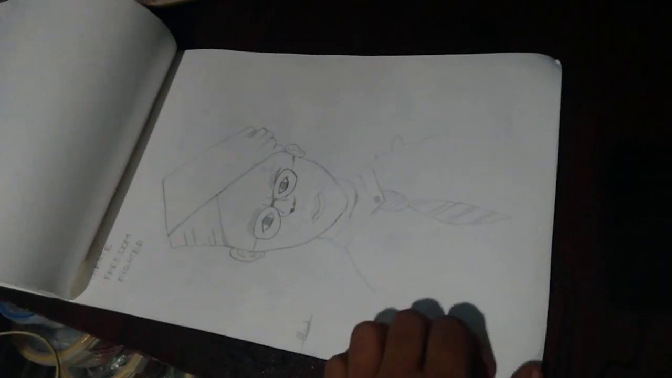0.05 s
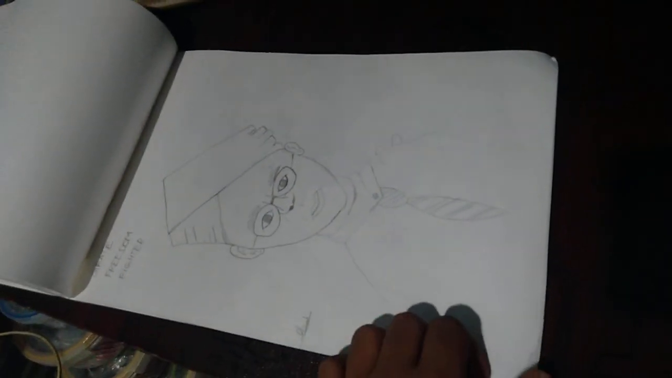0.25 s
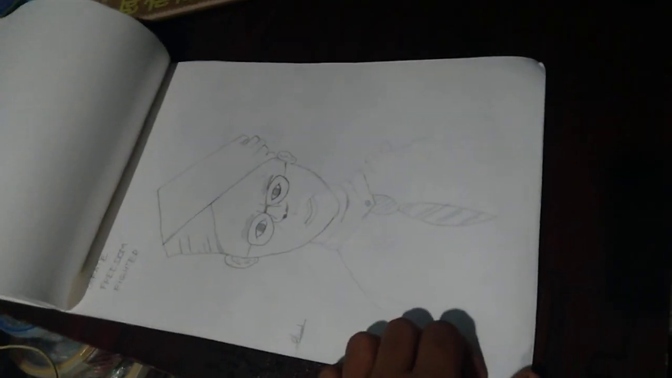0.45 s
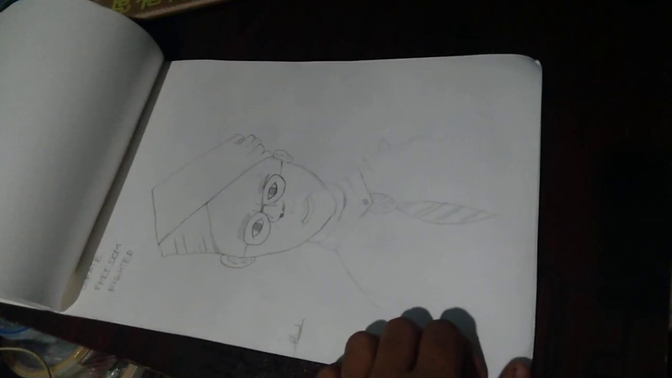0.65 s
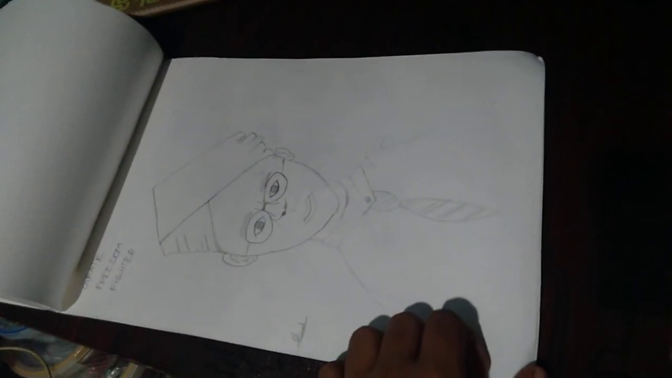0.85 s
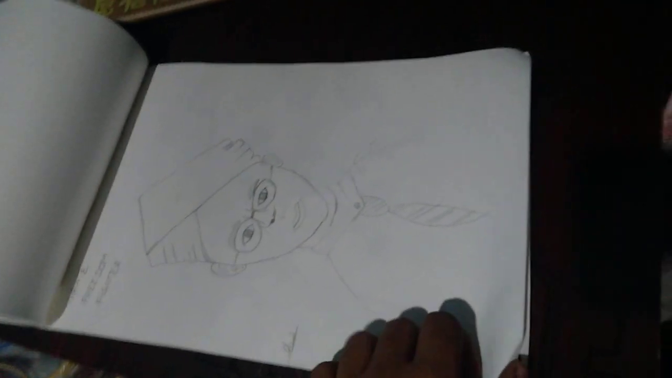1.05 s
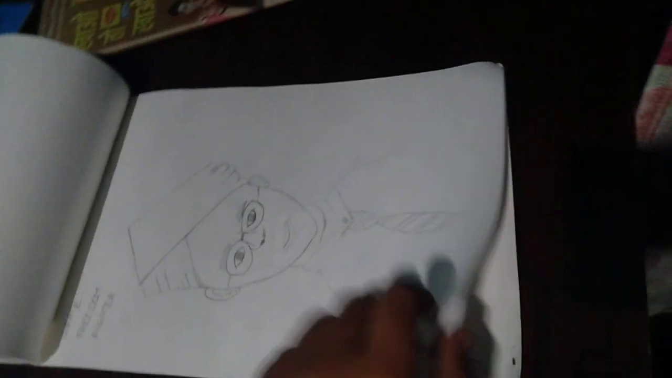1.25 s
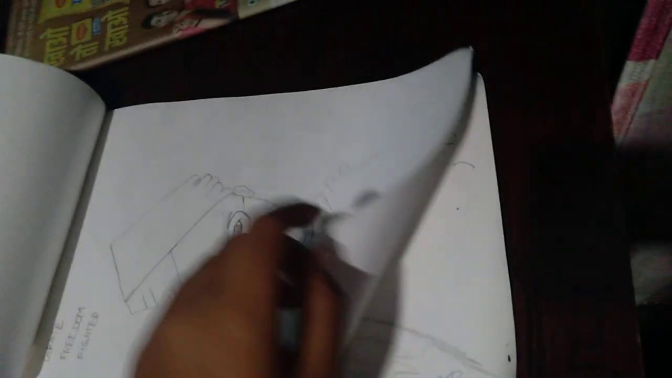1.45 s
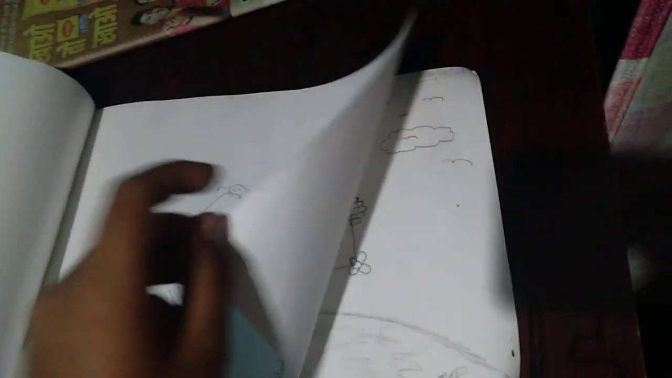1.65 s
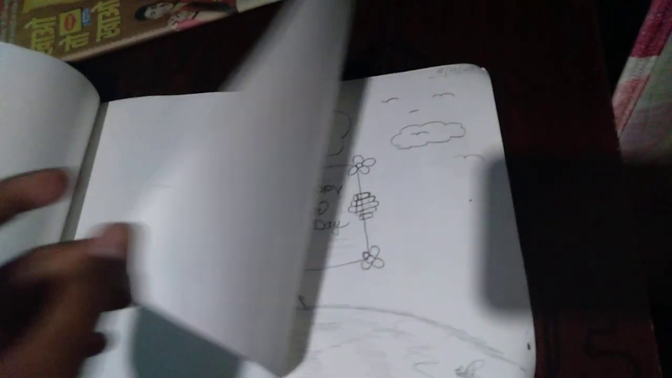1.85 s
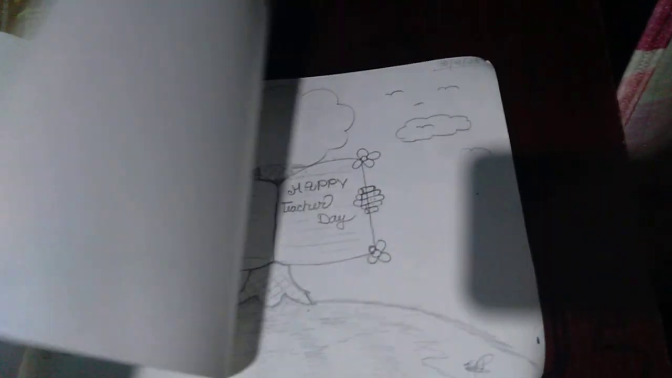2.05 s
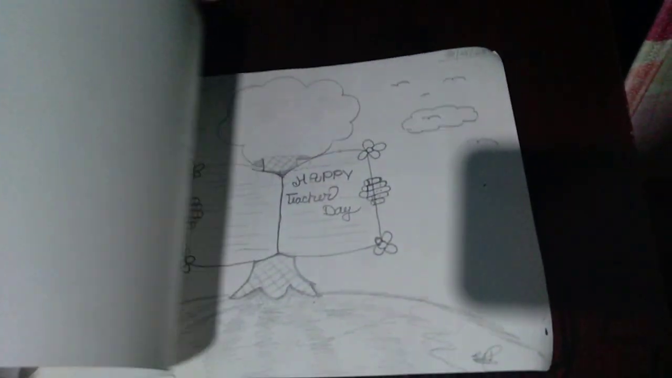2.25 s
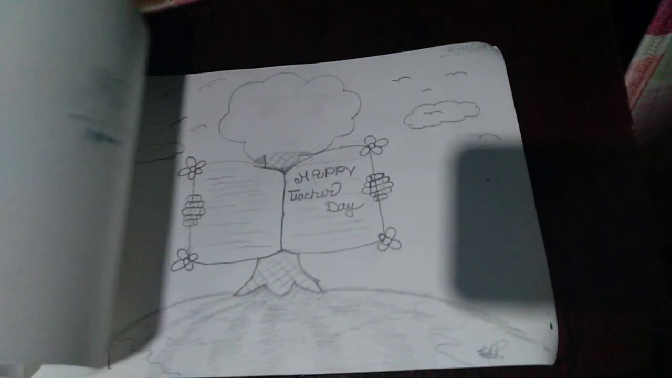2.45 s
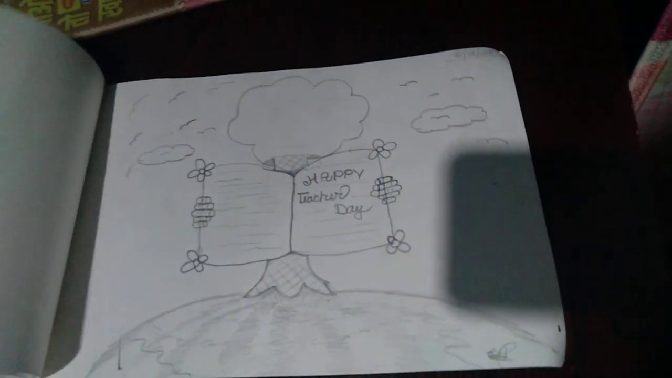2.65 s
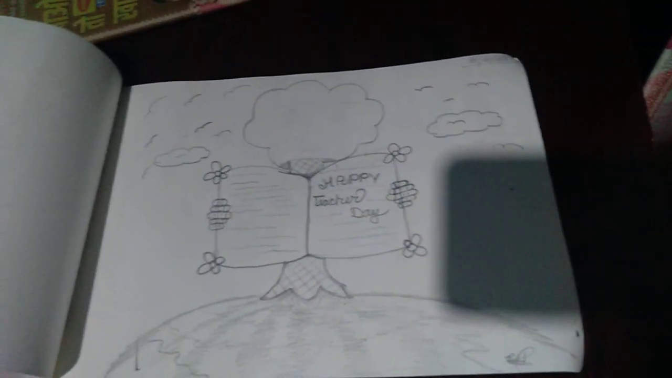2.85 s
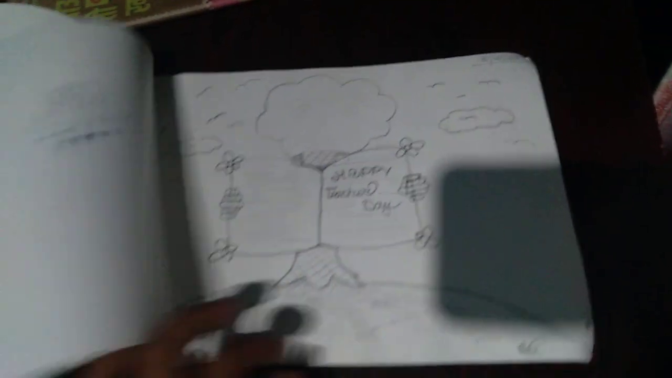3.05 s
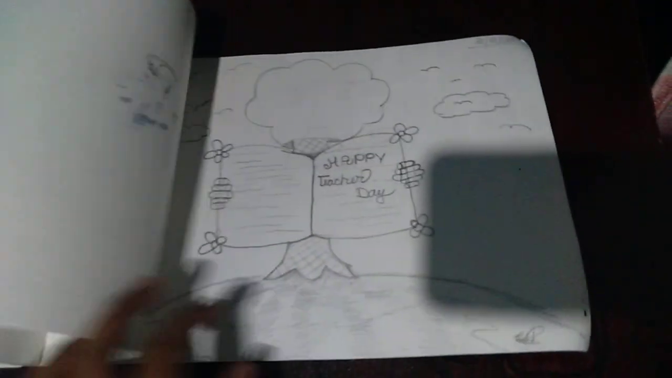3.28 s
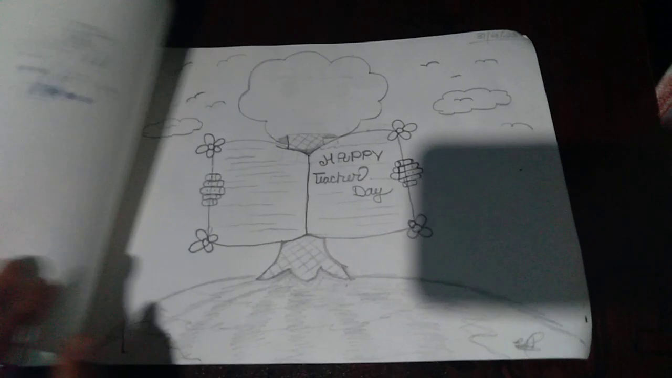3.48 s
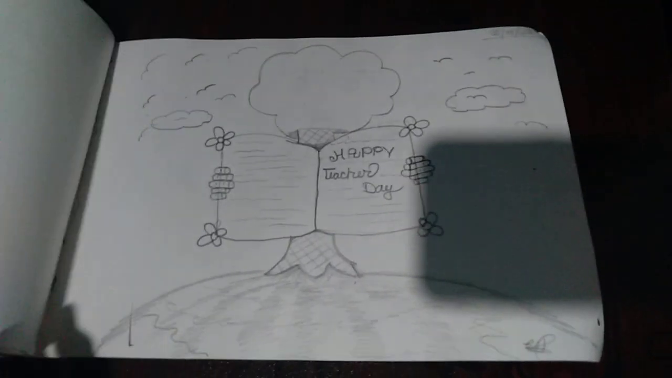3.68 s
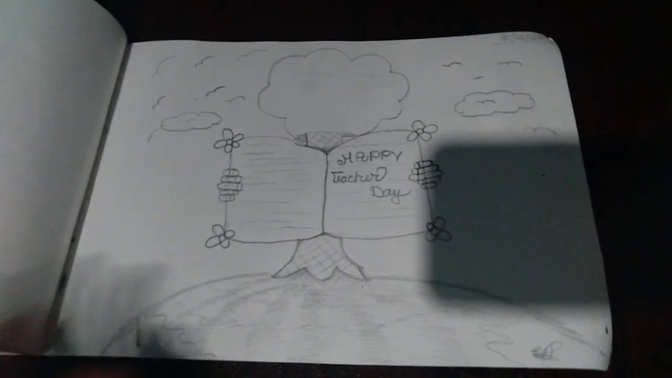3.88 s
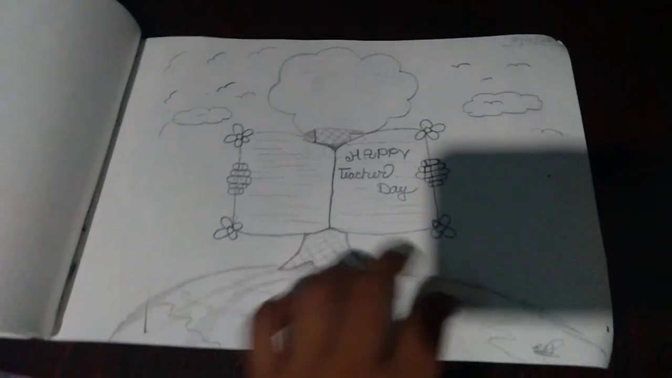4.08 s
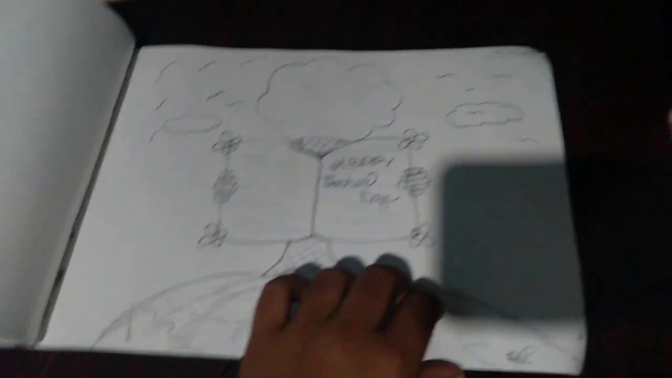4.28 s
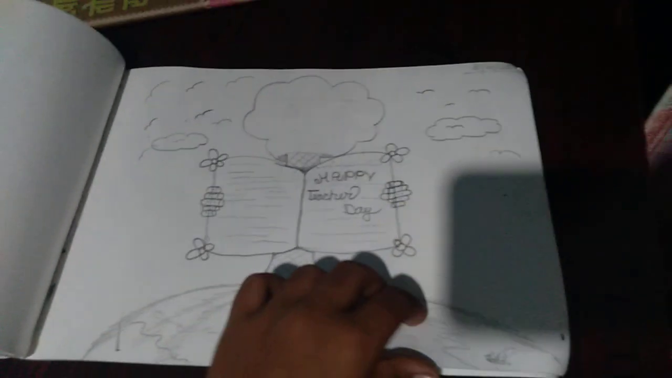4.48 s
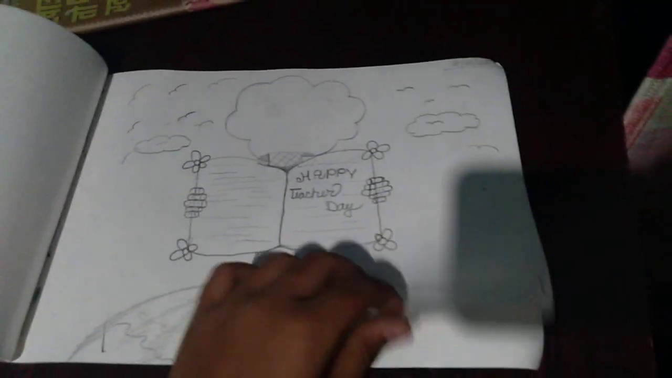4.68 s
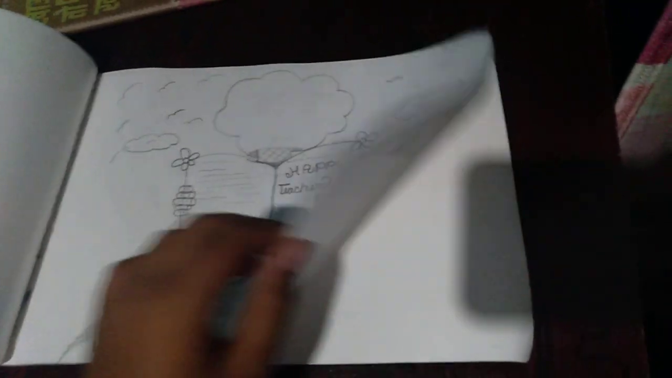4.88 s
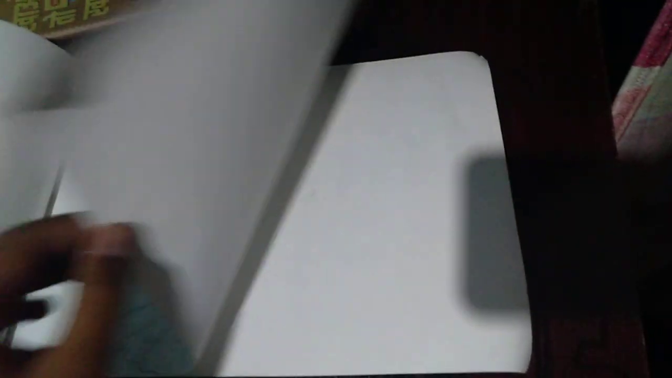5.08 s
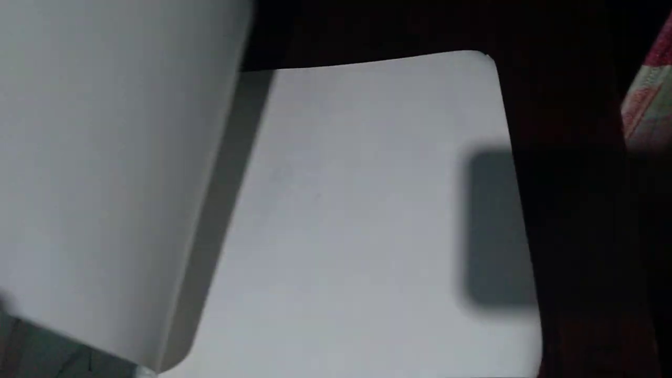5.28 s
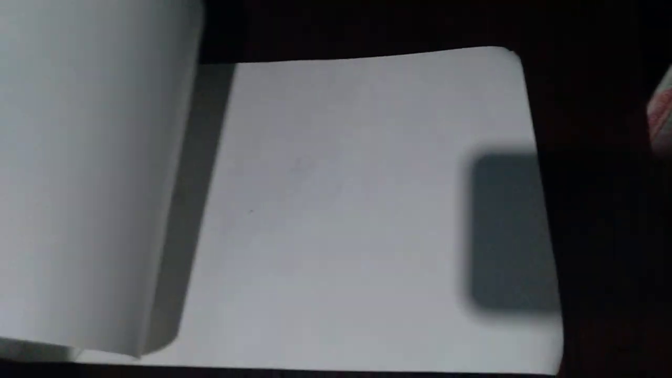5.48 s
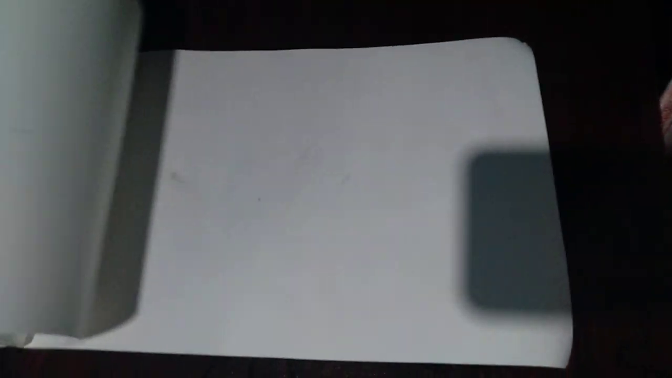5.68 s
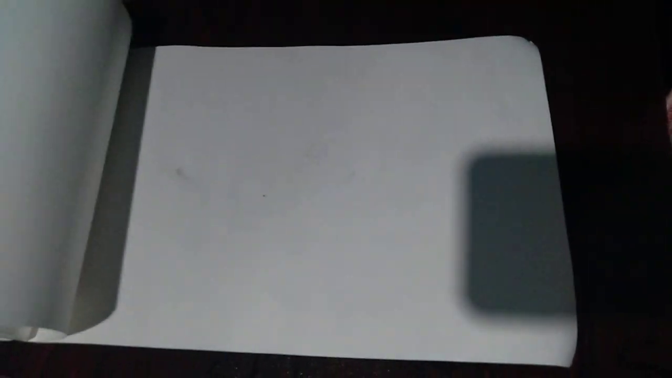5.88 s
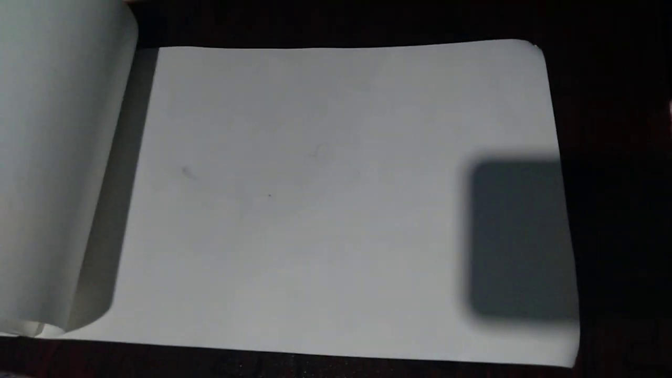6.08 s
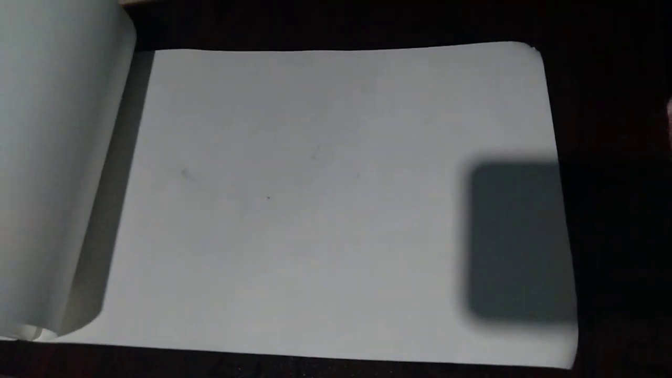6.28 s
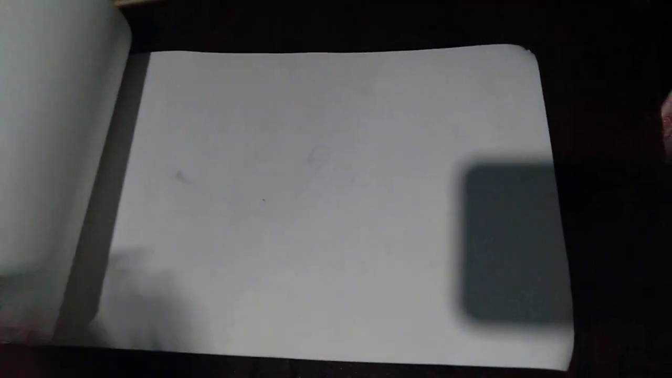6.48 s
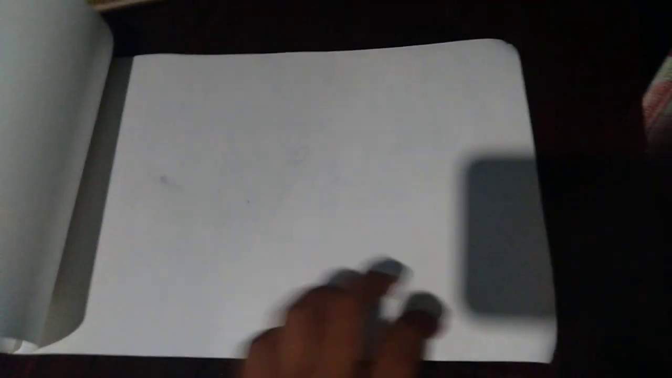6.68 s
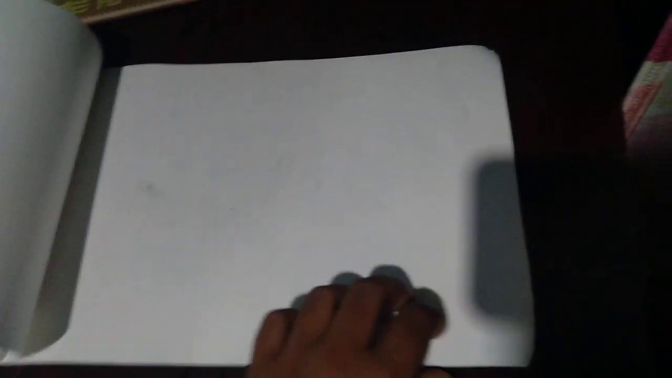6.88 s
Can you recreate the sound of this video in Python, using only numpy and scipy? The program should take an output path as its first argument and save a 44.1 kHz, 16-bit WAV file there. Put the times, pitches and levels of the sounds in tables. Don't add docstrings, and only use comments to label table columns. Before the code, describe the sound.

Sketchbook pages are turned and smoothed by hand in a quiet room, with crisp rustles, a papery slap and faint watery noise between.

```python
import sys
import numpy as np
from scipy import signal
from scipy.fft import rfft, irfft, next_fast_len
from scipy.io import wavfile
from scipy.ndimage import uniform_filter1d

SR = 44100
rng = np.random.default_rng(int(sys.argv[2]) if len(sys.argv) > 2 else 0)


def output_pcm(signal):
    pcm = np.clip(np.atleast_2d(signal).T, -1, 1) * 32767
    wavfile.write(sys.argv[1], SR, np.round(pcm).astype(np.int16))


def field_ratio(decibels):
    return 10 ** (np.asarray(decibels, dtype=float) / 20)


N = 306054
TIME = np.arange(N) / SR


def unit(x):
    return x / np.sqrt(np.mean(x ** 2))


def colour(x, table, lo=1, hi=SR):
    size = next_fast_len(len(x))
    f = np.maximum(np.arange(size // 2 + 1) * SR / size, 1)
    hz, db = np.transpose(table)
    edges = 1 / np.sqrt((1 + (lo / f) ** 16) * (1 + (f / hi) ** 16))
    gain = field_ratio(np.interp(np.log(f), np.log(hz), db)) * edges
    return irfft(rfft(x, size) * gain, size)[:len(x)]


def resonance(x, hz, width_hz):
    b, a = signal.iirpeak(hz, hz / width_hz, fs=SR)
    return signal.lfilter(b, a, signal.lfilter(b, a, x))


def evened(x, span_s, share):
    span = int(span_s * SR)
    slow = uniform_filter1d(uniform_filter1d(x ** 2, span), span)
    return unit(x / (slow + 1e-18) ** (np.clip(share, 0, 1) / 2))


def swell(s, db, rise_s, fall_s):
    age = TIME[::44] - np.asarray(s)[:, None]
    rise = np.maximum(rise_s, .002)[..., None]
    fall = np.maximum(fall_s, .002)[:, None]
    pace = np.where(age < 0, -rise, fall)
    return field_ratio(np.asarray(db)[:, None] - 20 * age / pace)


def smooth(steps):
    return np.interp(TIME, TIME[::44], steps)


def drift(shape, span):
    return uniform_filter1d(uniform_filter1d(rng.standard_normal(shape), span), span)


def streaks(depth_db, hold_s, patchy_db, size=576):
    overlap = size * 3 // 4
    cells = signal.stft(rng.standard_normal(N), nperseg=size, noverlap=overlap)[2]
    span = max(int(hold_s * SR / (size / 4)), 1)
    alone = drift(cells.shape, span)
    shared = uniform_filter1d(drift(cells.shape, span), size=9, axis=0)
    opened = field_ratio(depth_db * np.clip(unit(alone), .35, 1.45) + patchy_db * unit(shared))
    return signal.istft(cells * opened, nperseg=size, noverlap=overlap)[1][:N]


# freq_hz [Hz], level_db [dB per Hz]
ROOM_SPECTRUM = [(18, -42.5), (40, -6.5), (86, 6), (220, -10), (955, -27), (2270, -26.5), (7200, -6.5),
                 (15800, -26.5)]
# freq_hz [Hz], level_db [dB per Hz]
SELF_NOISE_SPECTRUM = [(100, -3), (300, -2.5), (1000, -15.5), (4500, -17), (5500, -2), (7500, -6.5),
                       (11000, -9.5), (15800, -21)]


def room_floor(plain):
    air = streaks(depth_db=20.5, hold_s=.05, patchy_db=2.5)
    room = unit(colour(air, ROOM_SPECTRUM)) * field_ratio(-77)
    return room + unit(colour(plain, SELF_NOISE_SPECTRUM)) * field_ratio(-80.5)


# freq_hz [Hz], level_db [dB per Hz]
RUB_SPECTRUM = [(180, -37.5), (300, 6.5), (404, -1.5), (519, 2.5), (643, -0.5), (785, 6), (1090, -6),
                (1520, -11.5), (5290, -24.5), (7250, -7.5), (15800, -36)]
# start_s [s], level_db [dB], brightness_oct [octaves above 1 kHz], fall_s [s]
TOUCHES = [(0.0, -67.5, 1, 0.11), (0.0, -73, 4, 0.84), (0.406, -63, 2, 0.085), (1.602, -64.5, 1, 0.11),
           (1.89, -61.5, 2, 0.13), (2.356, -66, 1.65, 0.27), (2.357, -74.5, 1.5, 0.45),
           (2.681, -60, 0.2, 0.074), (3.355, -60.5, 2, 0.33), (3.354, -61.5, 7, 0.77),
           (3.618, -51, 3, 0.077), (3.882, -57, 4.5, 0.051), (3.881, -62, 2.5, 0.11), (4.059, -67, 2, 0.42),
           (4.059, -61, -9, 0.1), (4.225, -59.5, 4, 0.05), (4.225, -64.5, 1.46, 0.15),
           (4.405, -61.5, 2, 0.32), (4.884, -62.5, 0.9, 0.23), (5.121, -61, 0.5, 0.25),
           (5.12, -62.5, 3.5, 0.13), (5.403, -70, 2, 0.21), (6.341, -60, 1.46, 0.094),
           (6.341, -63.5, 2.5, 0.15), (6.405, -60.5, 2.5, 0.13), (6.405, -63.5, 1.5, 0.08),
           (6.518, -63.5, 3.5, 0.21), (1.995, -63.5, 1.8, 0.056), (5.455, -77, -1, 0.064),
           (5.503, -75, 1, 0.12)]
# peak_s [s], level_db [dB], brightness_oct [octaves above 1 kHz], rise_s [s], fall_s [s]
STROKES = [(0.138, -55, 2.5, 0.033, 0.047), (0.13, -54.5, 1.5, 0.057, 0.053),
           (0.091, -55.5, 4.5, 0.081, .1), (0.064, -64, 1.5, 0.078, 0.088),
           (1.317, -60.5, 2.12, 0.051, 0.18), (1.322, -62, 6.5, 0.033, 0.17),
           (2.3, -61.5, 1.3, 0.061, 0.12), (1.5, -63.5, 3.2, 0.047, 0.057), (1.186, -78, 2.5, 0.077, 0.15),
           (1.01, -72.5, 4, 0.092, 0.23), (4.2, -66, 3.5, 0.08, 0.1), (3.53, -60.5, 3, 0.074, 0.19),
           (3.39, -69.5, 4.5, 0.04, 0.053), (0.23, -71, 1.9, 0.21, 0.12), (0.654, -63.5, 3, 0.066, 0.082),
           (0.2, -66.5, 1.5, .1, 0.16), (1.42, -66.5, 1.5, 0.037, 0.051), (1.93, -66, 1.4, 0.13, 0.064),
           (0.84, -95, 2, 0.056, 0.1), (1.04, -60, 9, .2, 0.15), (1.346, -62, 3.5, 0.094, 0.083),
           (2.9, -62.5, 4.5, 0.036, 0.17), (2.2, -65, 0.5, 0.067, 0.04), (2.664, -56.5, 2.5, 0.049, 0.07),
           (2.93, -71.5, 1, 0.13, 0.045), (3.015, -61.5, 4.5, 0.25, 0.086), (3.452, -62, 1.2, 0.105, 0.19),
           (4.5, -49, 6.5, 0.3, .05), (4.3, -68.5, 3, 0.24, 0.13), (4.74, -65.5, 0.1, 0.062, 0.17),
           (4.762, -73.5, 2, 0.27, 0.3), (5.72, -72.5, 1.7, 0.069, 0.11), (5.9, -67, 1.32, 0.076, 0.21),
           (6.32, -64.5, 2.5, 0.26, 0.024), (6.2, -73, 4, 0.2, 0.55), (0.13, -52, 3, 0.036, 0.048),
           (2.56, -68, 0.66, 0.047, 0.39), (3.5, -71.5, 2.15, 0.75, 0.36)]


def rubbing():
    streaky = streaks(depth_db=27.0, hold_s=0.077, patchy_db=3.0)
    plain = rng.standard_normal(N)
    s, db, touch_octave, fall_s = np.transpose(TOUCHES)
    touches = swell(s, db, np.array([.004]), fall_s)
    s, db, stroke_octave, rise_s, fall_s = np.transpose(STROKES)
    gains = np.vstack([touches, swell(s, db, rise_s, fall_s)])
    octaves = np.concatenate([touch_octave, stroke_octave])
    out = np.zeros(N)
    for band in np.arange(-1.15, 3.8, .7):
        share = field_ratio(-7.5 * (octaves - band) ** 2)
        bed = field_ratio(-93 + 3.5 * band)
        lo_hz, hi_hz = 1000 * 2 ** (band - .35), 1000 * 2 ** (band + .35)
        broken = evened(colour(streaky, RUB_SPECTRUM, lo_hz, hi_hz), span_s=0.15, share=0.88)
        even = unit(colour(plain, RUB_SPECTRUM, lo_hz, hi_hz))
        gain = smooth(np.sqrt(share ** 2 @ gains ** 2 + bed ** 2))
        even_share = np.clip(0.72 - 0.39 * max(band - 1, 0), 0, 1)
        mix = even_share / (1 + (field_ratio(-67.5) / gain) ** 2)
        out += gain * (np.sqrt(1 - mix) * broken + np.sqrt(mix) * even)
    return out


def pitched_noise(table, source, lead):
    out = np.zeros(N)
    for t0, t1, hz, width_hz, db in table:
        part = slice(int(max(t0, 0) * SR), min(int(t1 * SR), N))
        age = np.linspace(0, 1, part.stop - part.start)
        noise = source[part.start:part.stop + lead]
        tone = unit(resonance(noise, hz, width_hz)[lead:])
        out[part] += field_ratio(db) * tone * np.minimum(age / 0.2, 1) * (1 - age) ** 0.53
    return out


# start_s [s], end_s [s], pitch_hz [Hz], width_hz [Hz], level_db [dB]
WHISTLES = [(0.0, 0.11, 8700, 500, -65), (0.1, 0.165, 9700, 1200, -55), (0.04, 0.2, 15000, 1200, -64),
            (0.97, 1.09, 8100, 560, -67), (1.29, 1.44, 8740, 660, -64), (1.56, 1.85, 8900, 190, -74),
            (1.89, 1.99, 8900, 560, -66), (1.97, 2.16, 6000, 170, -76), (2.36, 2.6, 8000, 550, -67.5),
            (2.4, 2.6, 11100, 810, -73), (3.35, 3.5, 11500, 1200, -68), (3.42, 3.52, 5800, 190, -60.5),
            (3.52, 3.64, 6600, 200, -61.5), (3.5, 3.63, 12400, 1500, -70), (3.36, 3.43, 14000, 1200, -66),
            (4.76, 4.88, 7200, 350, -66), (6.15, 6.7, 10970, 1000, -73.5), (6.68, 6.94, 10500, 1200, -70.5),
            (6.82, 6.94, 7100, 120, -59), (6.22, 6.36, 2290, 200, -67), (6.8, 6.94, 4600, 210, -75.5),
            (6.86, 6.94, 3100, 100, -73.5), (1.15, 1.28, 2930, 250, -71), (1.62, 1.78, 3090, 100, -74.5),
            (2.32, 2.36, 820, 130, -46), (4.25, 4.6, 1710, 180, -71), (0.1, 0.47, 5600, 120, -71.5),
            (0.62, 0.7, 7600, 900, -60.5), (0.4, 0.51, 5700, 150, -71.5), (0.5, 0.7, 10900, 300, -71.5),
            (6.76, 6.94, 3760, 120, -74), (6.79, 6.9, 2800, 120, -77), (6.78, 6.87, 1300, 90, -79.5),
            (6.62, 6.7, 5500, 130, -67), (3.04, 3.08, 4700, 300, -40), (1.74, 1.86, 2410, 250, -72),
            (2.78, 2.9, 150, 46, -68), (5.3, 5.42, 190, 85, -70), (3.4, 3.62, 350, 126, -71.5)]


def whistles():
    lead = SR // 5
    streaky = streaks(depth_db=18.5, hold_s=0.062, patchy_db=0.8)
    return pitched_noise(WHISTLES, np.concatenate([streaky[:lead], streaky]), lead)


# pitch_hz [Hz], width_hz [Hz], level_db [dB]
GRIP_MODES = [
    [(72.4, 38, 0.5), (110.5, 29, -6), (35, 39, -14)],
    [(224, 74, 7), (296.5, 40, -7.5)],
]
# peak_s [s], level_db [dB], rise_s [s], fall_s [s]
THUDS = [(0.05, -71, 0.18, 0.36), (1.57, -84, 0.27, 0.1), (2.21, -51.5, 0.036, 0.19),
         (2.348, -55, 0.23, 0.11), (2.47, -65, 0.12, 0.16), (3.07, -57.5, 0.03, 0.34),
         (3.17, -56.5, 0.12, 0.23), (3.8, -52.5, 0.15, 0.064), (4.05, -64, 0.089, 0.088),
         (4.31, -56.5, 0.066, 0.091), (4.85, -59, 0.097, 0.37), (5.07, -58.5, 0.25, 0.12),
         (0.45, -70.5, .15, .12), (0.7, -73.5, .1, 0.092), (1.0, -76, 0.078, 0.092),
         (1.35, -71, 0.092, 0.089), (1.7, -73, 0.21, 0.14), (5.699, -69, 0.14, 0.21),
         (6.73, -73.5, 0.27, 0.096)]
# peak_s [s], level_db [dB], rise_s [s], fall_s [s]
BOOMS = [(1.391, -61.5, 0.086, 0.092), (2.219, -45, 0.03, 0.049), (2.7, -68, 0.085, 0.55),
         (3.05, -52, 0.016, 0.24), (3.67, -56.5, 0.071, 1), (4.2, -62.5, 0.3, 0.22),
         (4.441, -55.5, 0.021, 0.049), (4.85, -52.5, 0.13, 0.26), (5.08, -56.5, 0.19, 0.087),
         (5.7, -66, 0.54, 0.59), (6.33, -64.5, 0.84, 0.17), (6.7, -76, 0.58, 0.19),
         (6.94, -73, 0.11, 0.091)]


def grip():
    out = np.zeros(N)
    for modes, events, bed_db in zip(GRIP_MODES, (THUDS, BOOMS), (-90.5, -100.5)):
        unsteady = unit(uniform_filter1d(rng.standard_normal(N), 1500))
        shake = rng.standard_normal(N) * field_ratio(5.5 * unsteady)
        body = sum(field_ratio(db) * unit(resonance(shake, hz, width_hz)) for hz, width_hz, db in modes)
        gain = np.sqrt((swell(*np.transpose(events)) ** 2).sum(axis=0) + field_ratio(bed_db) ** 2)
        out += evened(body, span_s=0.1, share=0.7) * smooth(gain)
    return out


# start_s [s], end_s [s], pitch_hz [Hz], width_hz [Hz], level_db [dB]
HUMS = [(0.674, 0.873, 540, 66, -60.5), (0.651, 0.78, 710, 110, -66.5), (0.772, 1.085, 1600, 360, -66),
        (0.95, 1.07, 1015, 32, -73), (0.085, 0.38, 1590, 270, -66.5), (1.442, 1.76, 1460, 210, -65.5),
        (1.648, 1.83, 1030, 18, -68), (1.736, 1.83, 450, 67, -67.5), (3.3, 4.43, 780, 106, -63.5),
        (4.466, 4.78, 797, 79, -74.5), (4.89, 5.38, 463, 140, -61.5), (5.621, 5.82, 737, 180, -63),
        (5.1, 5.26, 14500, 1100, -70), (0.68, 0.74, 2000, 77, -77), (1.839, 1.97, 790, 170, -67),
        (4.42, 4.62, 1135, 230, -68.5), (1.15, 1.26, 710, 62, -79.5), (2.35, 2.49, 810, 74, -69.5),
        (1.86, 1.93, 445, 110, -73), (4.051, 4.06, 6770, 300, -46.5), (3.04, 3.26, 120, 35, -57.5),
        (3.115, 3.17, 1440, 200, -41.5), (3.24, 3.35, 790, 150, -59.5), (2.006, 2.62, 75, 20, -59),
        (4.25, 4.4, 73, 17, -64.5)]


def hums():
    lead = SR // 5
    return pitched_noise(HUMS, rng.standard_normal(N + lead), lead)


# freq_hz [Hz], level_db [dB per Hz]
PAPER_SPECTRUM = [(150, -33.5), (250, 23), (428, -11), (536, 10.5), (684, 4), (967, 14.5), (1060, -32.5),
                  (1810, -21.5), (2110, -24), (3320, 9.5), (4860, -17), (7360, 8), (9720, -32),
                  (14500, -10), (15800, -24)]


def knocks(table, rise_ms, fall_ms):
    out, size = np.zeros(N), 2048
    t = (np.arange(size) - size // 4) / SR
    shape = np.exp(-(1000 * t / np.where(t < 0, rise_ms, fall_ms)) ** 2)
    for s, knock_db, hz, crack_db, tick_db in table:
        noise = rng.standard_normal((3, size))
        rough = unit(resonance(noise[0], hz, .9 * hz))
        knock = np.sin(2 * np.pi * hz * t + noise[0, 0]) + 0.32 * rough
        crack = colour(noise[1], PAPER_SPECTRUM, 2700, 5500)
        tick = colour(noise[2], PAPER_SPECTRUM, 5500, 15800)
        start = int((s + rise_ms / 1000) * SR) - size // 4
        for part, db in ((knock, knock_db), (crack, crack_db - 10.5), (tick, tick_db + 3.0)):
            out[start:start + size] += field_ratio(db) * shape * part / np.abs(shape * part).max()
    return out


# start_s [s], knock_db [dB peak], pitch_hz [Hz], crack_db [dB], tick_db [dB]
SNAPS = [(0.108, -55, 2020, -33, -65), (0.116, -55, 2020, -40, -61), (0.124, -37.5, 2960, -31, -46),
         (0.127, -39, 3370, -41, -41.5), (0.133, -47, 2250, -29, -54), (2.191, -34, 474, -24.5, -49),
         (2.676, -40.5, 1480, -70, -51), (3.035, -29, 2400, -10, -19.5), (3.045, -43.5, 2250, -17, -30),
         (3.091, -36.5, 1110, -34.5, -43.5), (3.296, -39.5, 1970, -38, -50), (3.302, -43.5, 910, -38, -38),
         (3.611, -47, 734, -32, -33.5), (3.63, -57, 790, -41, -49), (3.644, -45, 764, -54, -37),
         (3.734, -39, 960, -29, -50), (4.8, -31, 1090, -37, -64), (4.8, -29, 2240, -27, -66.5),
         (4.803, -29, 1865, -31, -66), (4.811, -28, 2380, -38, -64), (4.815, -34, 2500, -41, -65.5),
         (4.821, -39.5, 1900, -45, -60.5), (4.843, -44, 610, -33, -59.5), (6.329, -41, 2340, -54, -41),
         (6.333, -31, 2300, -41, -34.5), (6.337, -35, 1560, -58, -44), (6.513, -63.5, 1200, -46, -41.5)]


def snaps():
    return knocks(SNAPS, rise_ms=2.6, fall_ms=3.2)


# start_s [s], level_db [dB peak], ring_hz [Hz], dull_db [dB]
FLICKS = [(3.1128, -24.5, 6240, -25), (4.223, -47, 10500, -12), (0.13, -30, 8800, -6),
          (0.15, -40, 15000, -9), (0.15, -34, 9400, -6), (6.404, -52, 7000, -4), (2.2043, -26, 7400, -8),
          (2.2385, -25, 7200, -8), (3.0448, -20, 7600, -10), (3.035, -23, 13000, -19.5),
          (4.9157, -17.5, 7450, -13), (5.0393, -28, 7240, -3), (3.7335, -39, 7500, 9),
          (4.8423, -45, 7800, 3), (6.5146, -23.5, 7470, -31)]


def flicks():
    out, t = np.zeros(N), np.arange(-128, 256) / SR
    shape = np.exp(-(t / np.where(t < 0, .0004, .0007)) ** 2)
    for s, db, hz, dull_db in FLICKS:
        dull = field_ratio(dull_db) * np.cos(2 * np.pi * 3000 * t)
        start = int((s + .0024) * SR) - 128
        out[start:start + len(t)] += field_ratio(db - 2.0) * shape * (np.cos(2 * np.pi * hz * t) + dull)
    return out


def window(t0, t1, edge_s):
    return np.clip(np.minimum(TIME - t0, t1 - TIME) / edge_s + .5, 0, 1)


# time_s [s], slide_db [dB], flex_db [dB that lifts the duller parts]
RUSTLES = [
    [(2.193, -48, 3), (2.204, -43.5, 5.5), (2.24, -41, 2), (2.268, -40.5, -0.5), (2.29, -47, -0.5),
     (2.33, -53, 0), (2.346, -50, 1.5), (2.353, -58, 5.5)],
    [(3.034, -34.5, 0), (3.042, -40, 4), (3.046, -31.5, -1.5), (3.06, -35, -3), (3.085, -37, -6),
     (3.108, -41, -2), (3.114, -36, -3)],
    [(3.114, -33.5, 7.5), (3.134, -36, 8), (3.17, -35.5, 3.5), (3.204, -36.5, -0.5), (3.23, -43, -1.5),
     (3.28, -47, -0.5), (3.303, -47, 8), (3.32, -50, 7), (3.351, -53, 9.5)],
    [(3.644, -39.5, -9), (3.69, -39, -8), (3.73, -37.5, -5), (3.768, -39, 0), (3.79, -43, -1),
     (3.86, -46.5, 0.5), (3.877, -47, 2)],
    [(4.8, -62.5, 22.5), (4.809, -69, 14.5), (4.83, -69, 13), (4.842, -60.5, 2), (4.86, -60, -1),
     (4.874, -56.5, -3.5)],
    [(4.914, -48.5, 8.5), (4.93, -45, 1.5), (4.99, -50, 4.5), (5.03, -48.5, 5.5), (5.06, -47, 3.5),
     (5.095, -51, 5.5), (5.117, -53, 7.5)],
]
# freq_hz [Hz], level_db [dB per Hz]
SHEETS = [
    [(150, -40), (560, -21.5), (1150, -28.5), (3490, -12.5), (4450, -26), (7300, 0.5), (9720, -15),
     (15800, -19)],
    [(150, -37), (250, -1.5), (399, -27.5), (595, -11.5), (3320, -9.5), (4150, -11), (6640, -1),
     (15800, -8)],
    [(150, -48), (300, -18), (940, -6.5), (1300, -14.5), (3200, -12.5), (4500, -16.5), (6520, -4.5),
     (15800, -7.5)],
    [(150, -32.5), (250, 9.5), (459, -4.5), (1500, -2), (3430, 8), (5880, -3), (7490, 4), (15800, -7)],
    [(150, -39.5), (250, -10), (606, 8), (1520, -3), (3500, -4), (4770, -35.5), (10600, -33), (15800, -26)],
    [(250, -14), (536, -4), (951, -17.5), (1810, -9), (5600, -20.5), (7600, 4.5), (10500, -9.5), (14500, 1)],
]
# body_db [dB], scrape_db [dB], air_db [dB above the hiss],
# air_fade [dB of air lost per dB the slide weakens], dips [depth of the port dips, factor]
RUSTLE_PARTS = [(-6, 1, -15.5, 0, 0.43), (-11, -1.5, -6.5, .35, 0.33), (-12.5, -5.5, -4.5, 0.15, .55),
                (-11, -6.5, -5, 0.2, 1.8), (3.5, 12.5, -15, -1.2, .9), (-2.5, -3.5, -5.5, -0.6, 2.5)]
RUSTLE_TOP_HZ = [15650, 15940, 15850, 15900, 15700, 15220]
# low_hz [Hz], high_hz [Hz]
RUSTLE_EDGES_HZ = [
    (5900, 9300),
    (300, 1300),
    (1300, 5900),
    (9300, 17000),
]
# freq_hz [Hz], level_db [dB]
PORT = [(4500, -2), (5300, -3), (5850, -7.5), (6250, -2.5), (8700, -1), (9700, -6.5), (10700, 0.5)]


def rustle(plain):
    catches = unit(uniform_filter1d(rng.exponential(size=N) ** 3, size=40))
    wavering = unit(uniform_filter1d(rng.standard_normal(N), size=90))
    flicker = field_ratio(0.8 * wavering + 1.2 * catches)
    streaky = unit(streaks(depth_db=14.0, hold_s=0.14, patchy_db=3.0))
    out = np.zeros(N)
    for table, sheet, parts, top_hz in zip(RUSTLES, SHEETS, RUSTLE_PARTS, RUSTLE_TOP_HZ):
        body_db, scrape_db, air_db, air_fade, dips = parts
        s, slide_db, flex_db = np.transpose(table)
        part = slice(int((s[0] - .1) * SR), int((s[-1] + .1) * SR))
        slide = np.interp(TIME[part], s, slide_db)
        flex = np.interp(TIME[part], s, flex_db)
        air = slide + air_db + air_fade * (slide - max(slide_db))
        levels = (slide, slide + flex + body_db, slide + flex + scrape_db, air)
        port = [(hz, dips * db) for hz, db in PORT]
        opened = window(s[0], s[-1], edge_s=.004)[part]
        for db, edges in zip(levels, RUSTLE_EDGES_HZ):
            whole = 1 / (1 + field_ratio(2 * (-47 - db)))
            fibres = np.sqrt(whole) * plain[part] + np.sqrt(1 - whole) * streaky[part]
            bent = colour(fibres * flicker[part], sheet)
            bent = colour(bent, [(top_hz - 150, 0), (top_hz + 150, -45)])
            band = evened(colour(bent, port, *edges), span_s=.06, share=0.65)
            out[part] += opened * field_ratio(db) * band
    return out


# start_s [s], knock_db [dB peak], pitch_hz
# [Hz], crack_db [dB], tick_db [dB]
SLAPS = [
    (3.1145, -20, 880, -21, -33),
    (3.1155, -19.5, 1440, -16, -33.5),
    (3.115, -28.5, 600, -30, -40),
    (5.04, -42, 900, -42, -55),
]


def slaps():
    return knocks(SLAPS, rise_ms=.9, fall_ms=4.5)


# start_s [s], knock_db [dB peak], pitch_hz [Hz], crack_db [dB], tick_db [dB]
TAPS = [
    (4.054, -29.5, 518, -59, -51),
    (5.113, -43, 1500, -40, -57),
]


def taps():
    return knocks(TAPS, rise_ms=1.6, fall_ms=1.95)


def scene():
    plain = rng.standard_normal(N)
    mono = room_floor(plain) + colour(rubbing(), PORT) + whistles() + grip() + hums()
    mono += snaps() + flicks() + rustle(plain) + slaps() + taps()
    return np.array([mono, mono])


def roll_off(x):
    return signal.sosfilt(signal.butter(12, 17000, fs=SR, output="sos"), x)


def record(dry):
    low_pass = signal.ellip(10, .2, 60, 15900, fs=SR, output="sos")
    return roll_off(signal.sosfilt(low_pass, dry))


dry = scene()
out = record(dry)
output_pcm(out)
```